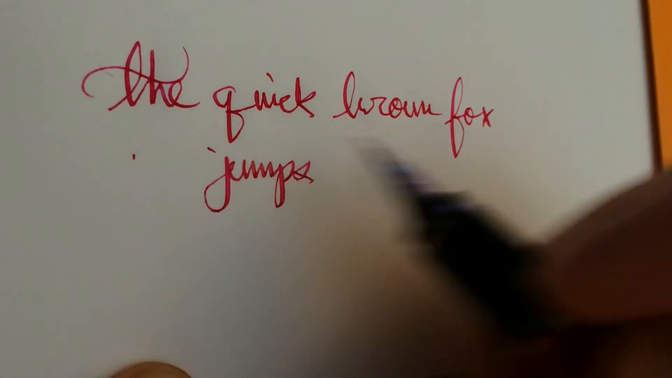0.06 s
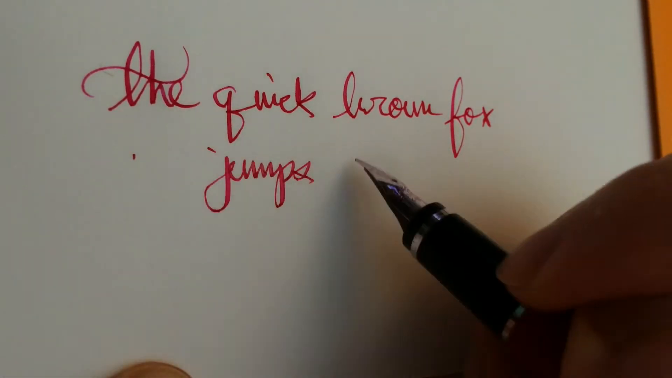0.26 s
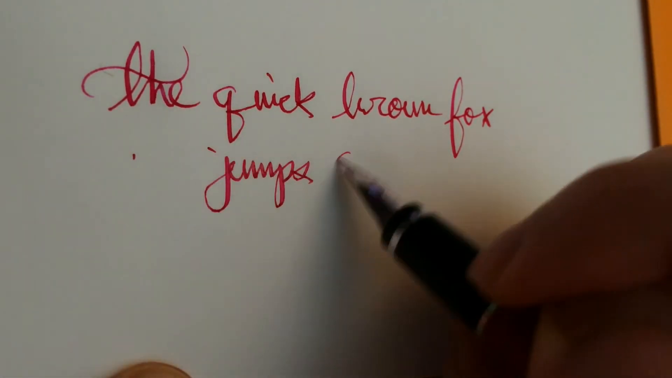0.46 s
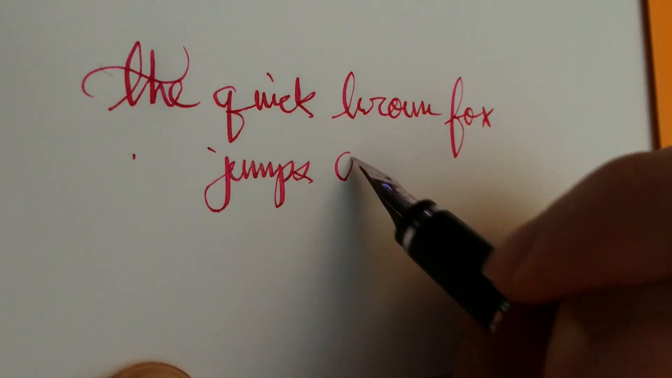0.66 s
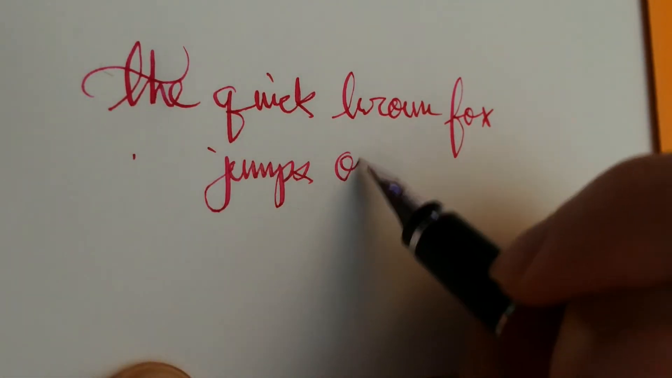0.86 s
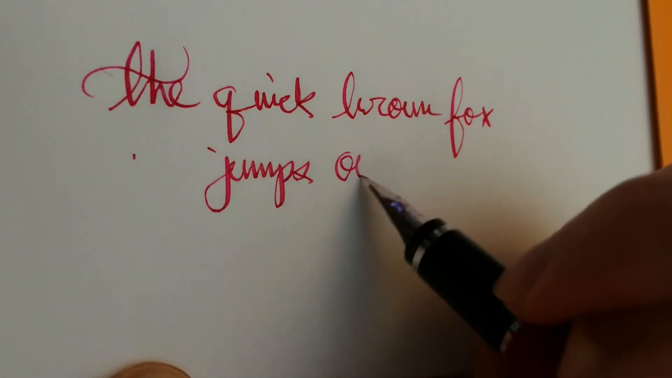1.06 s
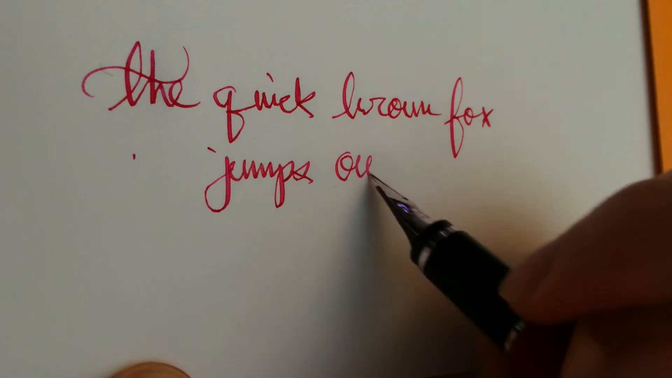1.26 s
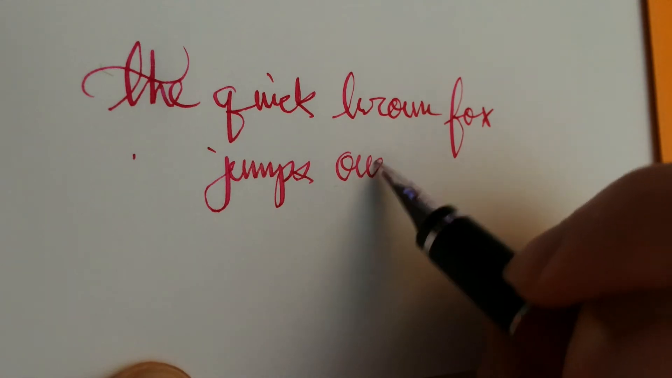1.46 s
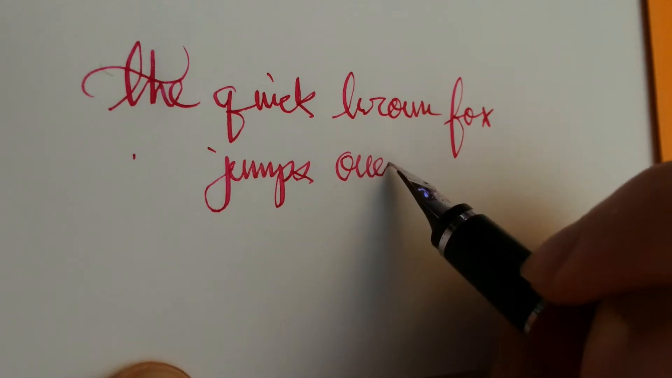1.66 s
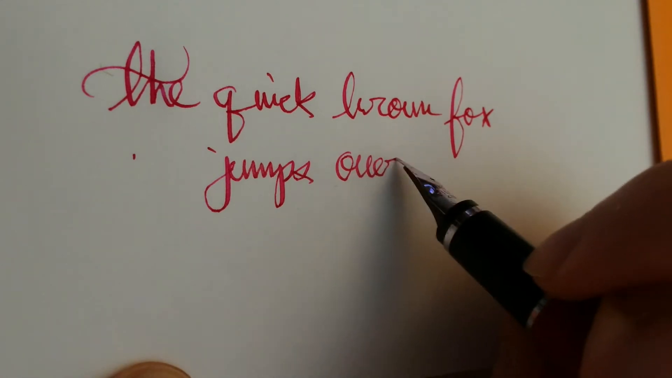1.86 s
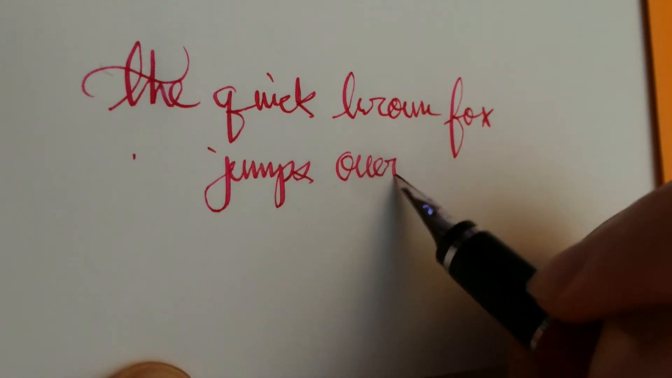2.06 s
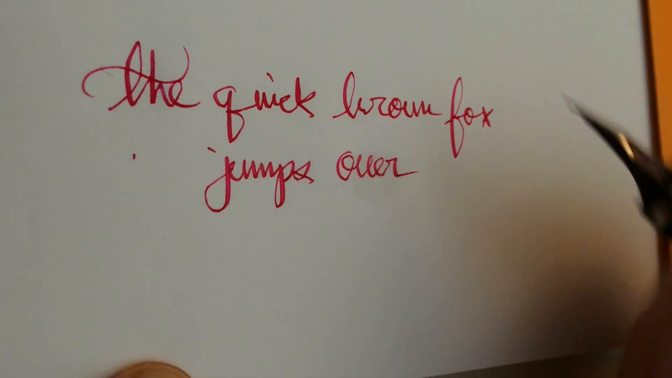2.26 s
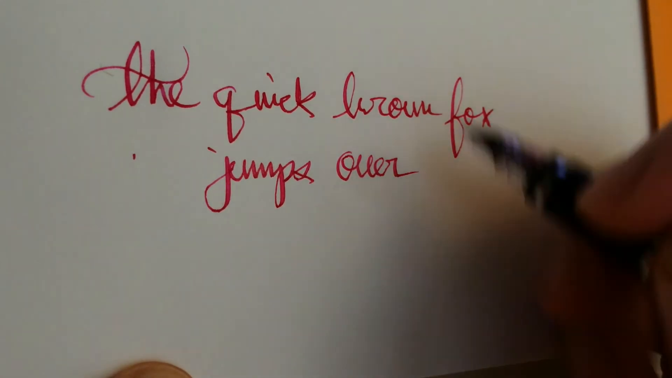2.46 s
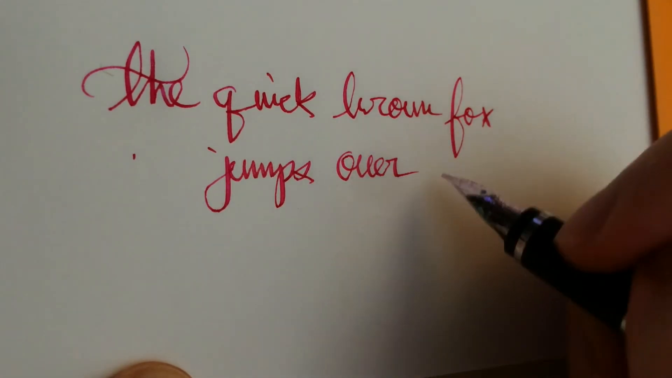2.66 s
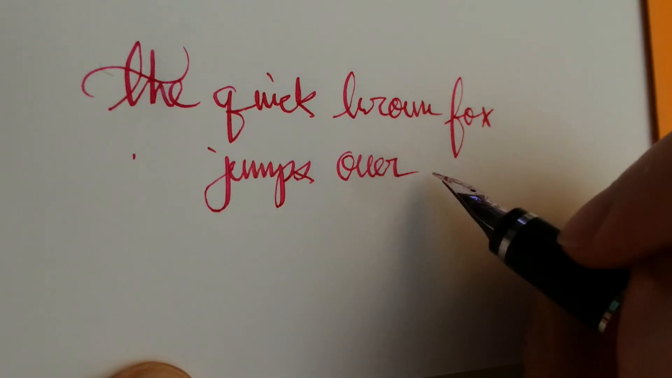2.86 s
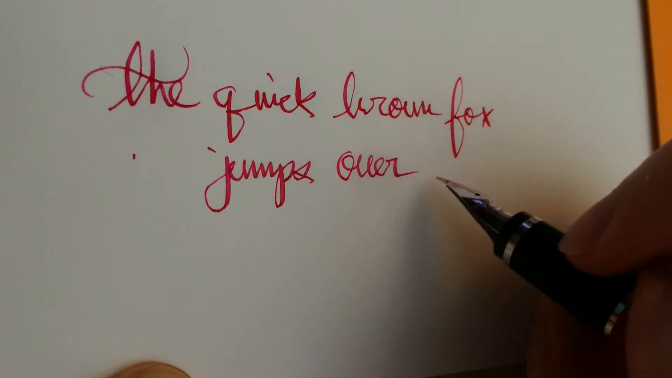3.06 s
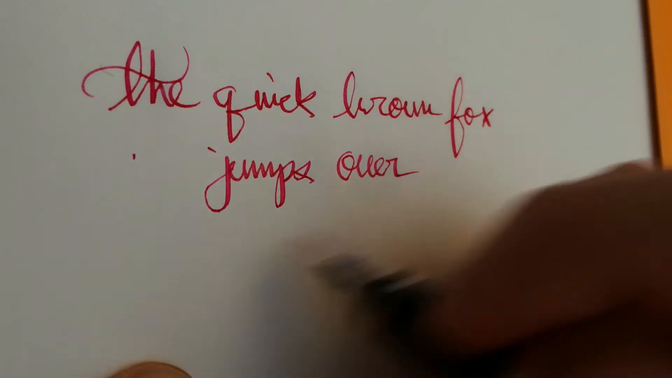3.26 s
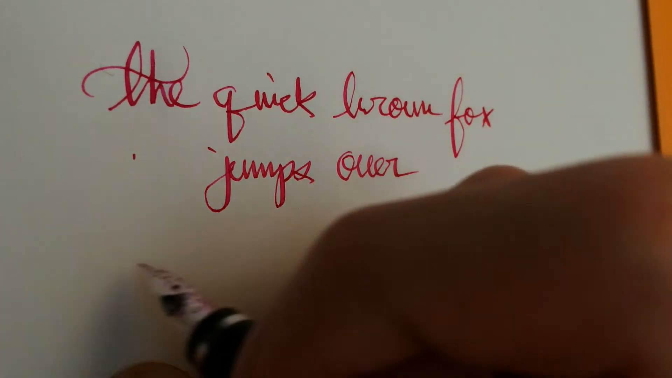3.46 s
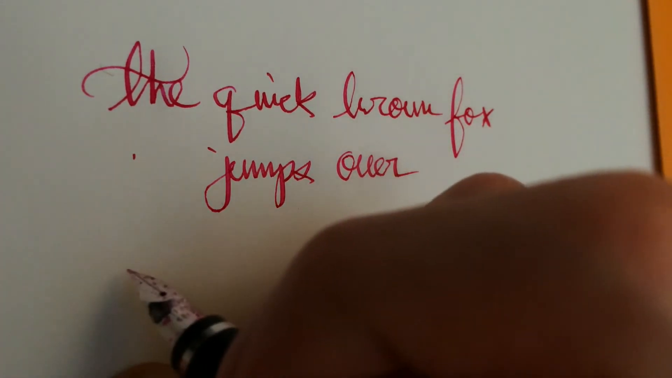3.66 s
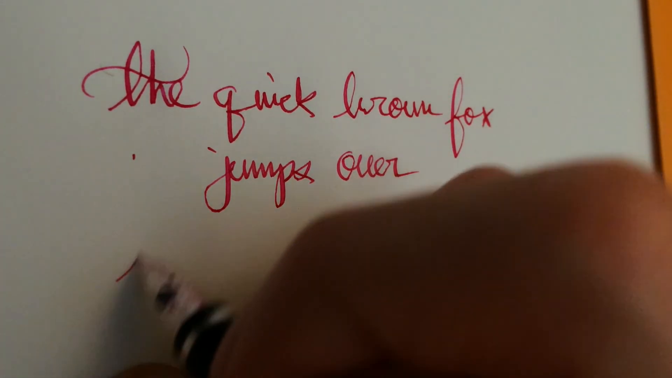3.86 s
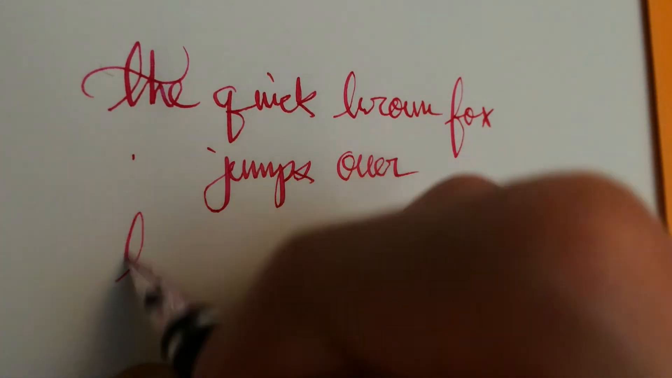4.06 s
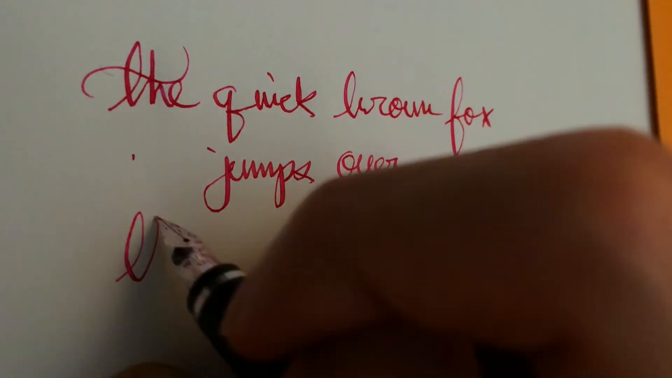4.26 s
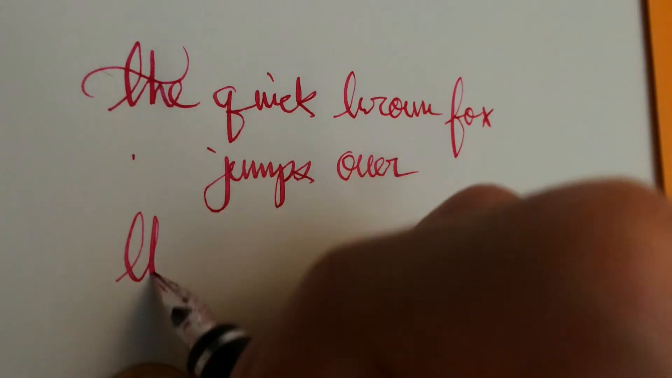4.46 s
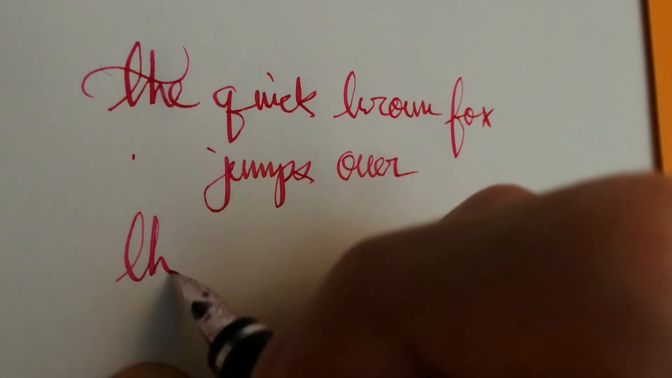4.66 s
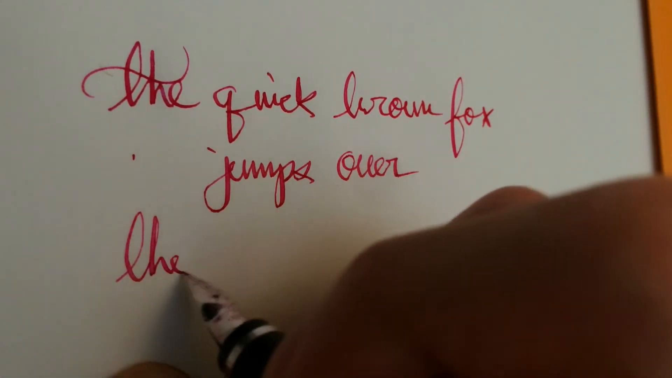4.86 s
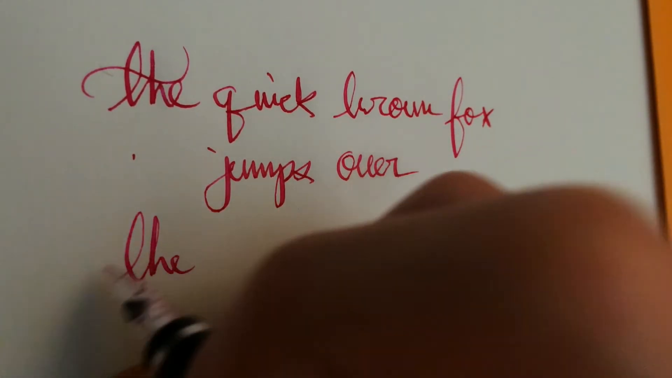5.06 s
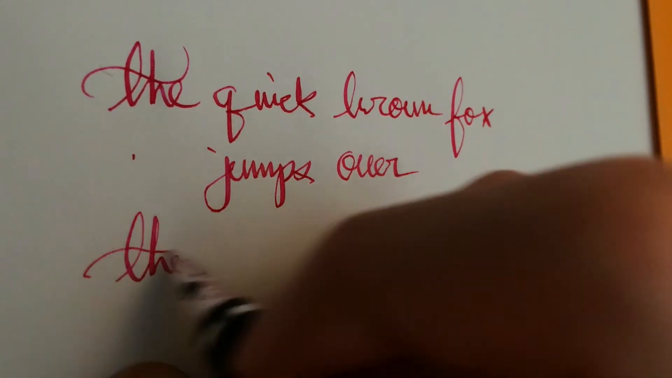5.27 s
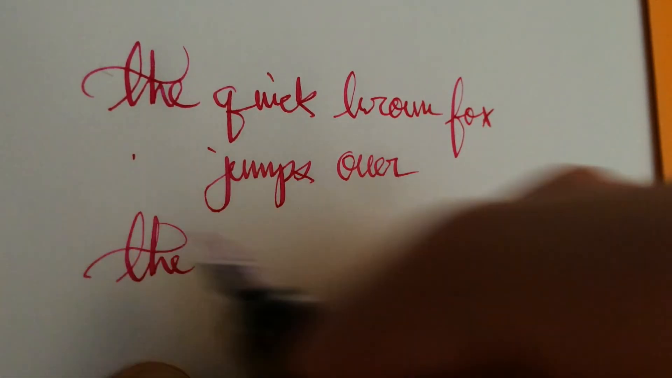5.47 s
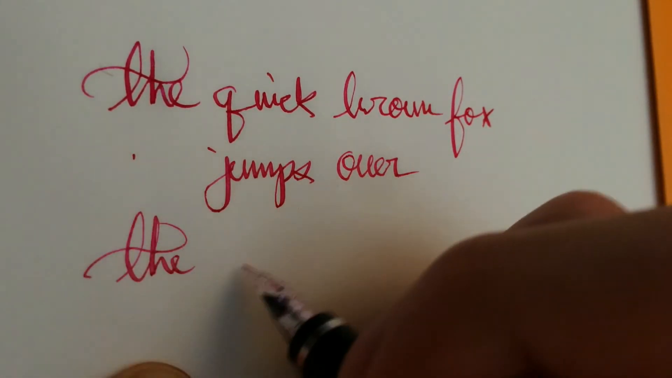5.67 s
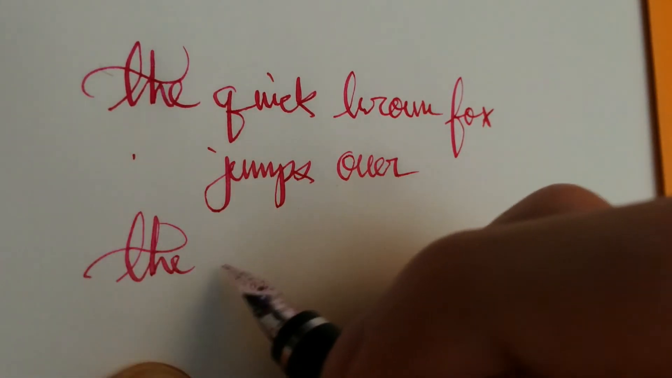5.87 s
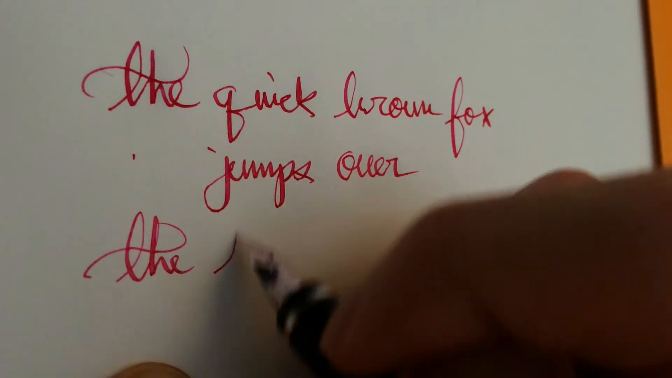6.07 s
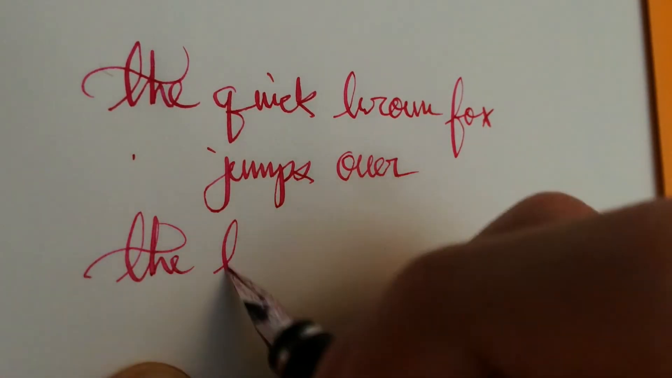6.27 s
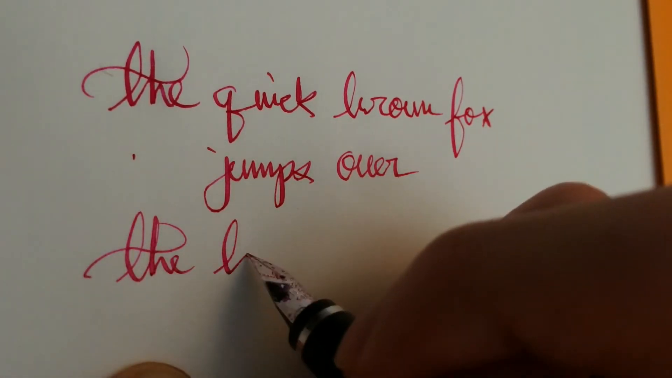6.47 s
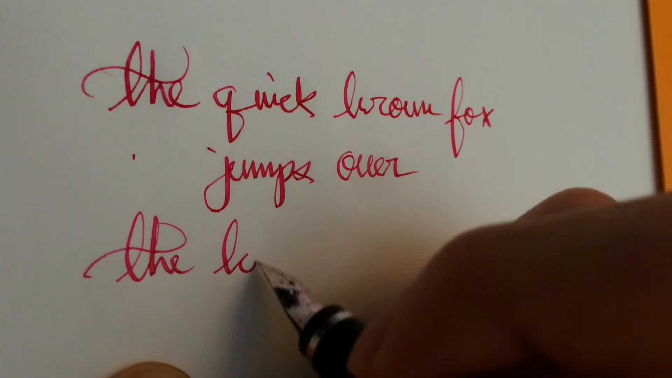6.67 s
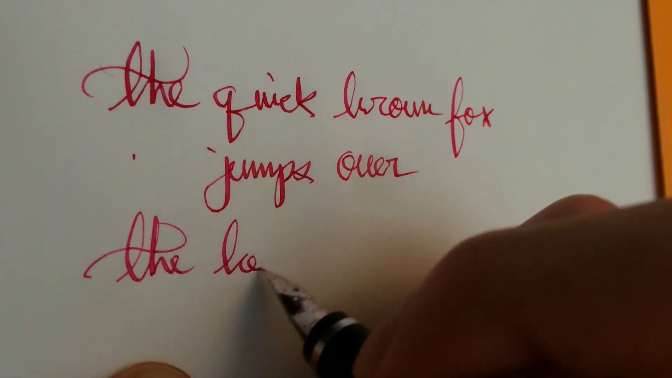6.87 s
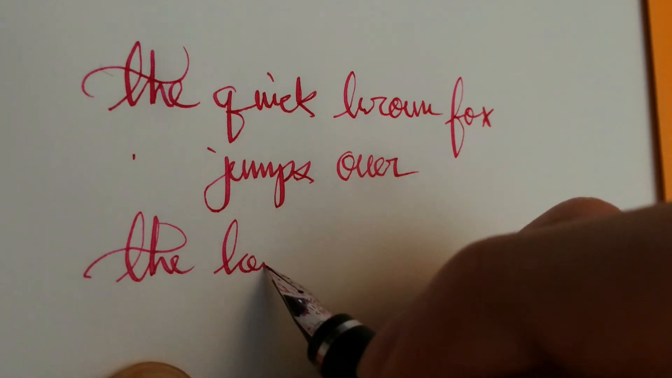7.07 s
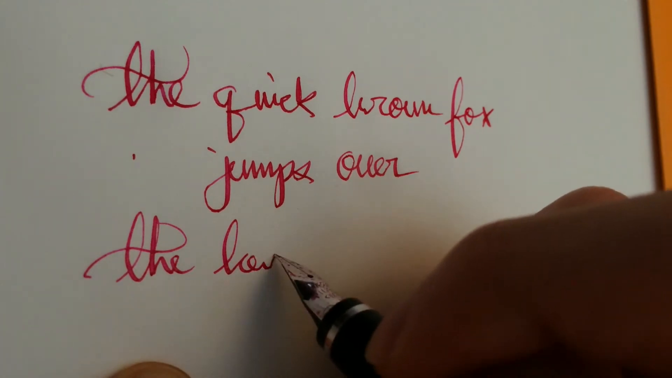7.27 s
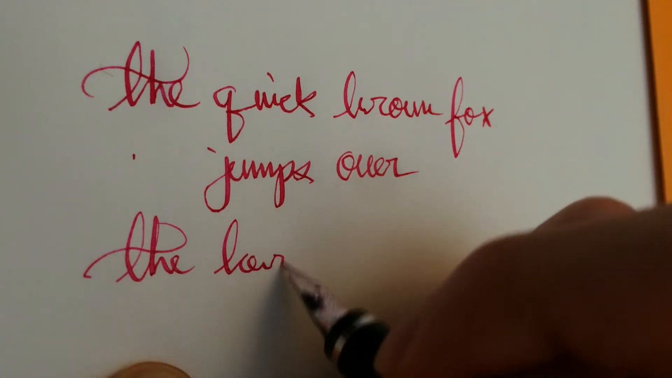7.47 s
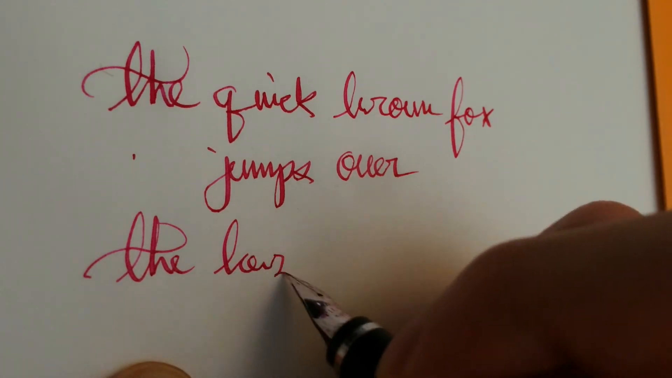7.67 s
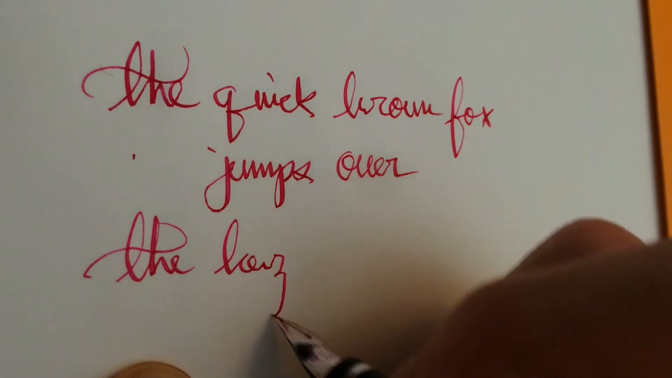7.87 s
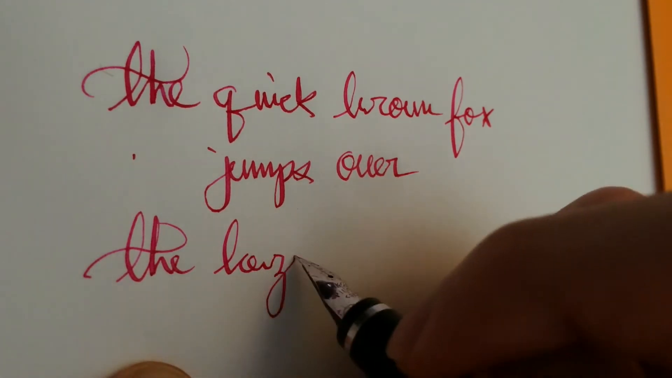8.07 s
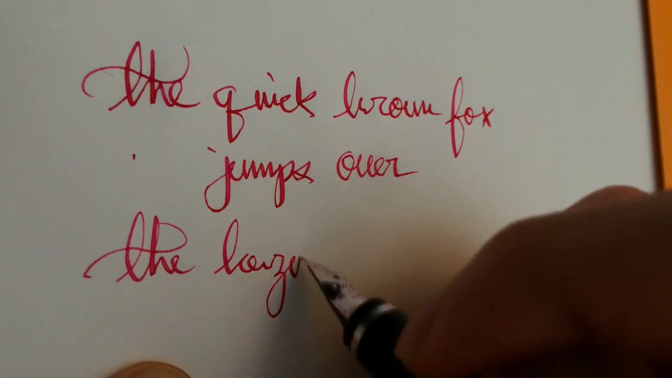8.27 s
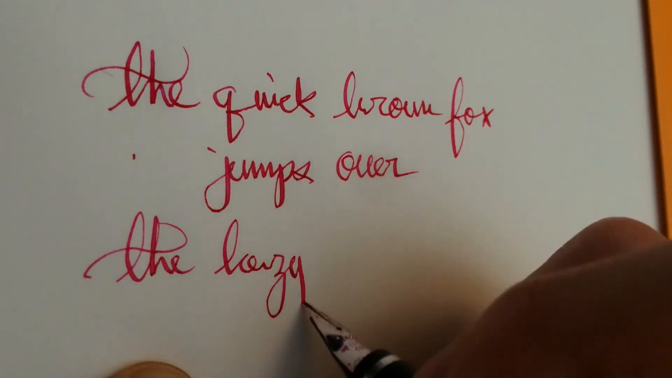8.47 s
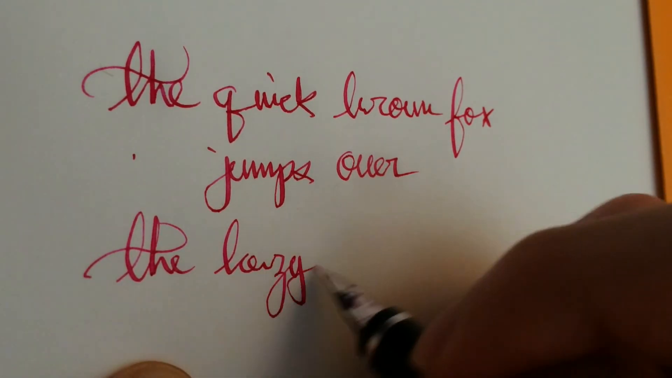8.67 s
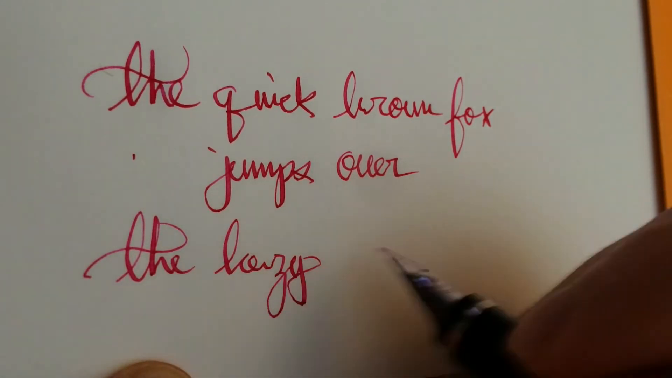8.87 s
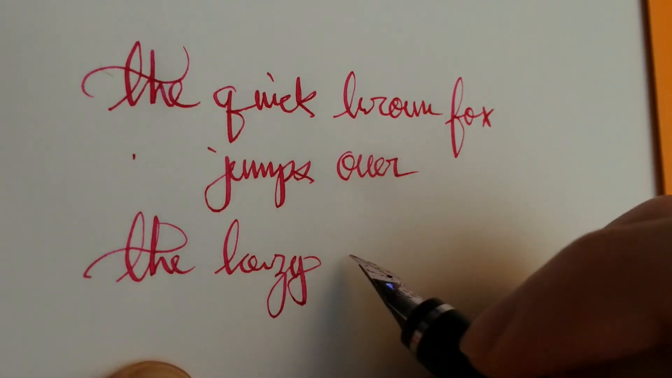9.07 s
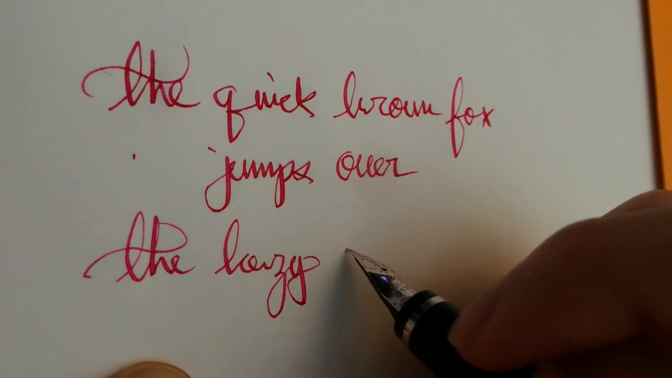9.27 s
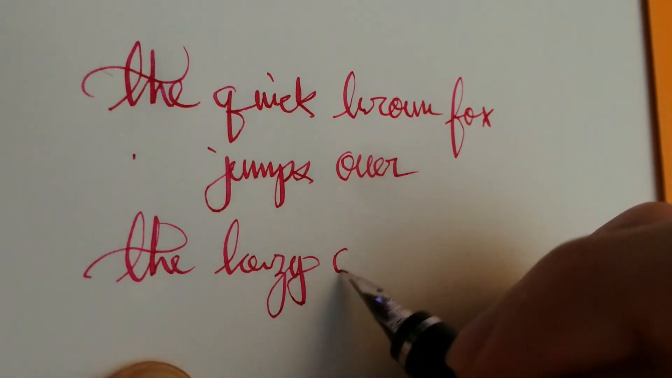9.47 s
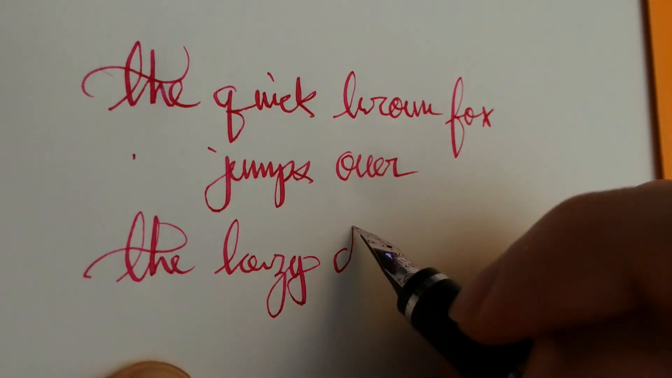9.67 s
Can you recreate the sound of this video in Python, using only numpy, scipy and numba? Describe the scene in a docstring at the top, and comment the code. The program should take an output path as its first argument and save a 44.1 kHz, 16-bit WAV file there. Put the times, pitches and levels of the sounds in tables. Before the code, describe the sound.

A fountain pen writes on a paper pad, close to the microphone in a quiet room. Short, dry scratching strokes come in uneven runs, dotted with sharp ticks as the nib catches and soft low bumps from the desk. After the first run comes a pause with faint rustles. The writing resumes more firmly, breaks briefly with a faint creak, then continues in a longer run over a low hum.

```python
"""Fountain pen on paper

A pen writes on a pad, close to a small microphone in a quiet room. Stick-slip friction between nib
and fibres excites the resonances of the pad and the steel tines; snags crack out singly. The hand
rumbles the desk, and between words faint creaks and rustles sound over the room's hum."""
import sys
import numpy as np
from scipy import signal
from scipy.fft import rfft, irfft
from scipy.io import wavfile
from scipy.ndimage import uniform_filter1d
from numba import njit

SR = 44100
rng = np.random.default_rng(int(sys.argv[2]) if len(sys.argv) > 2 else 0)


def master(y):
    """Save y as 16-bit WAV."""
    cut = np.clip(np.atleast_2d(y).T, -1, 1)
    pcm = np.round(cut * 32767)  # scale
    wavfile.write(sys.argv[1], SR, pcm.astype(np.int16))


N = 428211

# low and high modes of the steel tines: pitch_hz, width_hz, gain_db
TINE_LOW = [(1530, 730, 2.5), (2470, 393, 1.5), (3320, 540, -3), (4074, 270, -0.5), (4975, 1160, -4.5)]
TINE_HIGH = [(6570, 1240, 2), (7580, 1250, 5.5), (7940, 1110, 4.5), (11050, 1200, -1), (12230, 760, -4.5),
             (14500, 2000, -12)]


def strokes(speed, mean_speed, scratch_db, treble_db, pad_hz):
    """Stick-slip friction: coarse slips thump the pad, fine ones scratch, stray fibres crackle."""
    stutter = undb(0.92 * walk(60) + 2.0 * walk(200))
    coarse, fine = slips(500, 2.33), slips(12000, 2.0)
    ring = unit(pad(coarse + 0.67 * fine, np.clip(pad_hz, 300, 1500)))
    bursts = signal.lfilter([1], [1, -np.exp(-1 / (0.00047 * SR))], np.abs(slips(90, 1.75)))
    fibres = unit(bursts * rng.standard_normal(N))
    rub = fine + 0.16 * coarse + .5 * fibres
    scratch = undb(-treble_db / 2) * unit(body(rub, TINE_LOW, 3.3))
    scratch += undb(treble_db / 2) * unit(body(rub, TINE_HIGH, 1.55))
    # within a stroke the scratch swells less with speed than the thumping does
    swell = speed ** 1.332 * mean_speed ** 0.69
    # pressed hard, the spread tines add a rasp of their own
    rasp = undb(-4.5) * speed ** 2.69 * unit(steep_band(coarse + fine, 2400, 420))
    return stutter * (speed ** 2 * ring + undb(scratch_db) * swell * scratch / 2 + rasp)


def nib_motion():
    """Sliding speed drives friction: the pad's amplitude goes as its square. Also sets the timbre."""
    # pen strokes: start_s, rise_s, steady_s, fall_s, ring_db, relative_scratch_db
    gestures = [(0.034, 0.0035, 0.00032, 0.017, -38, -10.5), (.075, 0.039, 0.0035, 0.0032, -55.5, 11),
                (0.476, 0.074, 0.00065, 0.039, -38.5, -8.5), (.575, 0, 0.062, 0.053, -50.5, -4),
                (.677, 0, 0.026, 0.029, -39.5, -6.5), (0.725, 0.051, 0.003, 0, -41, -18),
                (0.797, 0.0013, 0.019, .02, -45, -4), (0.833, 0.039, 0.075, 0.029, -43.5, -9.5),
                (1.022, 0.015, 0, 0.093, -43, -8.5), (1.132, 0.05, 0.0071, 0.069, -44, -1),
                (1.274, 0, 0.0096, 0.15, -46, -6), (1.397, 0.028, 0.0039, 0.053, -41.5, -5),
                (1.503, 0, 0.17, 0.017, -53.5, -7), (1.66, 0.058, 0.021, 0.003, -47, -12),
                (1.81, 0.0037, 0.0033, 0.031, -47, -7.5), (1.867, .069, 0.00032, 0.001, -46.5, -3),
                (2.046, 0, 0.012, 0.13, -52, -0.5), (2.167, 0.0028, 0.034, 0, -34.5, -11.5),
                (2.207, 0.007, 0.054, 0, -67, 6), (3.886, 0.076, 0.014, 0, -35, -4.5),
                (3.938, 0.066, 0.0052, 0.021, -24, -10.5), (4.069, 0.044, 0.0074, 0.059, -28, -11),
                (4.165, 0, .098, 0, -50, -3.5), (4.258, 0.051, 0.0051, 0.039, -30.5, -1.5),
                (4.397, 0.05, 0.0005, 0.054, -30, -10), (4.556, 0, 0.024, .02, -49.5, -12),
                (4.588, 0.00049, 0.00057, 0.035, -35.5, -9), (4.635, 0.033, 0, 0.062, -49, 0),
                (4.738, 0.04, 0.0036, 0.019, -40.5, -6), (4.813, 0.0044, .109, 0.0017, -52, -7.5),
                (4.926, 0.049, 0, 0.017, -47.5, -0.5), (5.18, 0.0091, 0, 0.031, -43.5, -4.5),
                (5.23, 0.029, 0.089, 0.008, -35, -5), (5.343, 0, 0.0011, 0.048, -28.5, -11.5),
                (5.379, 0.048, 0.0088, 0.026, -35, -5), (6.05, 0.032, 0.081, .04, -39, -8),
                (6.246, 0.023, 0.0084, .09, -30.5, -15), (6.431, 0.034, 0.004, 0.034, -35.5, -11),
                (6.582, 0.0052, 0, 0.035, -38, -19), (6.62, 0.025, 0.13, 0.024, -55, -5),
                (6.822, 0, .165, 0, -52.5, -8), (7.105, 0, .057, 0.0058, -65.5, -9),
                (7.194, 0, 0.03, 0.036, -57, -11), (7.277, 0.003, 0, 0.059, -50, -1.5),
                (7.465, 0.0053, 0.013, 0.066, -52.5, -6), (7.526, 0.034, 0.001, 0.032, -36.5, -14.5),
                (7.595, 0.0011, 0.0014, 0.041, -46.5, -5), (7.716, 0.0046, 0.0018, 0.058, -48.5, -13.5),
                (7.781, 0.079, 0.0023, 0.072, -37.5, -10), (7.912, 0, 0.048, 0.0087, -45.5, -5),
                (7.972, 0, 0.079, 0.11, -41.5, -8), (8.196, 0.0037, 0.019, 0.088, -44, -8),
                (8.31, 0.016, 0.0016, 0.032, -32.5, -14.5), (8.421, 0.04, 0.0048, 0.02, -38.5, -9.5),
                (8.456, 0, 0.087, 0.018, -48, -3.5), (8.608, 0.00055, 0.0073, 0.033, -28.5, -19),
                (8.639, 0.0028, 0, 0.029, -29.5, -21), (8.672, 0.0028, 0.064, 0, -52, -6.5),
                (8.706, 0.0011, 0, 0.076, -32.5, -13), (8.788, 0.051, 0, 0.022, -33.5, -9),
                (8.885, .015, 0.012, .02, -56.5, 2), (9.389, 0.013, .026, 0.0037, -38.5, -5),
                (9.444, 0.0037, 0.024, 0.13, -48, -4.5), (9.56, .03, .05, 0.021, -44, -9),
                (9.645, .008, .006, 0, -36, -14), (9.672, 0, .01, .04, -36, -10)]
    # the pad's resonance shifts as the nib crosses the page: time_s, pitch_hz
    pad_tuning = [(.1, 786), (.5, 607), (1.1, 650), (2.2, 707), (3.95, 660), (4.6, 770), (5.3, 762),
                  (6.2, 730), (6.8, 764), (7.55, 720), (7.95, 810), (8.3, 690), (8.7, 777), (9.4, 620),
                  (9.7, 655)]
    t = np.arange(N) / SR
    speed, held = np.zeros(N), np.ones((3, N))
    for start, rise, steady, fall, db, scratch_db in gestures:
        corners = start + np.cumsum([0, rise, steady, fall])
        i, j = int(start * SR), min(int(corners[3] * SR), N)
        stroke = undb(db / 2) * np.interp(t[i:j], corners, [0.23, 1, 1, 0.19])
        takeover = i + np.argmax(stroke > speed[i:j])
        speed[i:j] = np.maximum(speed[i:j], stroke)
        treble_db = -5 - 0.18 * (db + 48.5)  # harder strokes are duller
        held[:, takeover:] = [[stroke.mean()], [scratch_db], [treble_db]]
    smooth = int(0.0029 * SR)
    speed = np.abs(uniform_filter1d(speed, smooth))
    pad_hz = np.interp(t, *np.transpose(pad_tuning)) * (1 + 0.069 * walk(20))
    return speed, *uniform_filter1d(held, 2 * smooth), pad_hz


def snags(speed):
    """Impulse excitation: the nib snaps free of a fibre, cracking the tines and knocking the pad."""
    # catches on fibres: time_s, crack_drive_db, knock_drive_db
    catches = [(.0383, -38, -34), (0.5248, -33.5, -43), (0.6866, -34.5, -42), (0.7388, -49, -28),
               (0.7697, -42, -40), (0.7926, -38, -59), (0.892, -28.5, -26), (1.2767, -47, -31),
               (1.371, -43, -58), (1.3927, -33.5, -36), (1.5253, -40, -48), (1.6671, -37.5, -44),
               (1.679, -39, -46), (1.691, -51, -42), (1.7186, -40.5, -48), (2.1655, -18.5, -25),
               (2.2694, -46.5, -45), (3.266, -45, -41), (3.8387, -48, -47.5), (3.9557, -26, -36),
               (3.9883, -34, -25), (4.0153, -40, -16), (4.073, -44, -52), (4.2671, -29, -24),
               (4.456, -43, -22), (4.5583, -36.5, -26), (4.567, -48, -26), (4.591, -39, -27),
               (4.7414, -32.5, -28), (4.7661, -39, -29.5), (5.2385, -33, -20.5), (5.3291, -32, -18),
               (5.3972, -35, -20.5), (5.5448, -44.5, -46), (5.9902, -50.5, -70), (6.0822, -37.5, -18.5),
               (6.2588, -44, -30), (6.4316, -32, -30), (6.4562, -30, -19.5), (6.4698, -40, -16),
               (6.575, -41, -27), (6.8234, -49, -36), (7.2035, -43, -57), (7.2432, -40, -38),
               (7.5662, -49, -25.5), (7.6022, -30.5, -44), (7.8381, -37.5, -31), (7.847, -42, -26),
               (7.866, -44, -24), (7.9165, -24.5, -26), (7.9305, -26, -31), (7.9479, -34.5, -19),
               (7.9786, -33, -21.5), (8.0596, -24.5, -21), (8.1937, -41, -41), (8.3192, -38, -33),
               (8.5963, -27, -29), (8.6098, -21.5, -19.5), (8.6423, -17, -13), (8.7107, -19.5, -16.5),
               (8.8285, -37, -45), (8.8973, -40, -51), (9.3913, -43, -32.5), (9.406, -29, -49),
               (9.654, -56, -33), (9.6731, -36, -23.5)]
    times, crack_db, knock_db = np.transpose(catches)
    high_db = -45 + 0.33 * (crack_db + 33)
    ticks = rng.random(N) < 70 / SR  # small catches all along the strokes
    ticks = ticks * undb(-50.5 + 2.82 * rng.exponential(size=N)) * (speed / 0.13) ** 1.14
    t = np.arange(int(.04 * SR)) / SR
    tail = np.exp(-t / 0.00066) + 0.27 * np.exp(-t / 0.0053)
    drives = impulses(times, crack_db) + ticks, impulses(times, high_db) + undb(-2.5) * ticks
    low, high = (signal.fftconvolve(x, tail)[:N] * rng.standard_normal(N) for x in drives)
    low -= 0.46 * band(low, 1470, 1100)  # a crack is thin: it stirs the lowest mode least
    crack = body(low, TINE_LOW, 0.44) + body(high, TINE_HIGH, 1.3)
    blows = impulses(times, knock_db)
    knock = pad(blows, np.full(N, 760.)) - undb(-11) * steep_band(blows, 1210, 670)
    return undb(7) * crack + undb(29) * knock


def pad(x, hz):
    """Damped resonance: the paper rings in one broad band, with a shoulder above and the wood below."""
    main = moving_band(moving_band(x, hz, 436.0), hz, 590.0)
    shoulder = moving_band(moving_band(x, 1.43 * hz, 600.0), 1.193 * hz, 735.0)
    return main - undb(-11.5) * shoulder - undb(-16.5) * steep_band(x, 359, 114)


def desk(speed):
    """Forced vibration: the desk top rumbles under the writing hand and booms at each bump."""
    # bumps of pen or hand: time_s, drive_db
    knocks = [(0.092, -45), (.697, -40), (1.422, -42), (1.715, -46), (2.092, -44), (3.254, -44.5),
              (4.172, -38), (4.451, -48), (4.559, -33.5), (4.671, -41), (5.65, -45.5), (6.09, -40),
              (6.33, -40), (6.459, -40), (8.219, -39.5), (8.454, -39), (8.605, -39.5), (8.9, -46)]
    # modes of the desk top: pitch_hz, width_hz, gain_db
    modes = [(55, 18, -6.5), (111, 49, -4), (161.7, 18, 4.5), (281, 49.5, -2), (346, 110, -5.5)]
    effort = np.abs(uniform_filter1d(speed, int(.06 * SR))) ** 0.92
    drag = effort * slips(3000, 1.6) * undb(-9.5 + 2.68 * walk(15))
    push = np.hanning(int(0.0041 * SR))
    bumps = np.convolve(impulses(*np.transpose(knocks)), push)[:N] * undb(8.5)
    return body(drag + bumps, modes, 1.3)


def creak():
    """A train of damped oscillations: slow, uneven pulses each ring briefly at their own pitch."""
    # course of the creak: time_s, pulses_per_s, level_db, pitch_hz
    course = [(5.588, 83, -47, 770), (5.604, 82, -44, 1090), (5.644, 61, -43.5, 720),
              (5.725, 75, -42.5, 1060), (5.76, 34, -61, 1180), (5.81, 69, -48, 1744)]
    times, per_s, db, hz = np.transpose(course)
    span = np.arange(times[0], times[-1], 1 / SR)
    cycles = np.cumsum(np.interp(span, times, per_s)) / SR
    onsets = np.interp(np.arange(cycles[-1]), cycles, span)
    out, t = np.zeros(N), np.arange(int(.04 * SR)) / SR
    grit = 1 + 0.65 * walk(830)
    for at, (size, detune) in zip(onsets, rng.standard_normal((40, 2))):
        pitch_hz = np.interp(at, times, hz) * (1 + 0.049 * detune)
        ring = np.exp(-t / 0.0055) * np.sin(2 * np.pi * pitch_hz * t)
        out[int(at * SR):][:len(t)] += undb(np.interp(at, times, db) + 1.5 * size) * ring
    return out * grit


def rustles():
    """Band-limited shot noise: short, grainy swells while the pen is lifted."""
    # faint rustles: start_s, length_s, level_db, centre_hz, width_hz
    swells = [(2.501, 0.065, -59.5, 3500, 1500), (2.506, 0.068, -61, 1350, 400),
              (2.564, 0.022, -58, 3700, 2500), (2.681, 0.069, -62, 3650, 3000),
              (2.798, 0.022, -64, 3500, 3000), (3.174, 0.32, -63.5, 5600, 10000),
              (3.246, 0.058, -58.5, 895, 1500)]
    t, out = np.arange(N) / SR, 0
    for start, length, db, hz, width in swells:
        swell = np.sin(np.pi * np.clip((t - start) / length, 0, 1))
        out += undb(db) * swell * unit(steep_band(slips(2000, 1.3), hz, width))
    return out


def walls(x):
    """Reverberation: the near walls return a short, exponentially decaying tail."""
    t = np.arange(int(.15 * SR)) / SR
    response = rng.standard_normal(len(t)) * np.exp(-t / 0.0099) * (t > .003)
    return undb(-35) * signal.fftconvolve(x, response)[:N]


def room():
    """The noise floor: hum of the room and hiss of the microphone, wavering a little."""
    # noise spectrum: frequency_hz, relative_density_db
    spectrum = [(12, -23), (20, -13.5), (53, -5), (98, -4.5), (158, -12), (198, -2.5), (262, -13.5),
                (485, -17), (780, -21.5), (1150, -25.5), (6910, -32.5), (13200, -32.5), (16000, -42.5)]
    hz, db = np.transpose(spectrum)
    bin_hz = np.maximum(np.arange(N // 2 + 1) * SR / N, 1)
    gain = undb(np.interp(np.log(bin_hz), np.log(hz), db))
    noise = irfft(rfft(rng.standard_normal(N)) * gain, N)
    return undb(-59.5 + 0.71 * walk(3.4)) * unit(noise)


def undb(db):
    """Decibels to amplitude ratio."""
    return 10 ** (np.asarray(db) / 20)


def unit(x):
    """Normalisation to an RMS of 1."""
    return x / np.sqrt(np.mean(x ** 2))


@njit
def moving_band(x, hz, width):
    """Tunable resonance: a state-variable band-pass, gain 1 at the centre."""
    y, mid, low = np.empty(len(x)), 0., 0.
    for i in range(len(x)):
        g, damping = np.tan(np.pi * hz[i] / SR), width / hz[i]
        v = (mid + g * (x[i] + 1e-18 - low)) / (1 + g * (g + damping))
        mid, low, y[i] = 2 * v - mid, low + 2 * g * v, damping * v
    return y


def band(x, hz, width):
    """Second-order resonance, gain 1 at the centre."""
    return signal.lfilter(*signal.iirpeak(hz, hz / width, SR), x)


def steep_band(x, hz, width):
    """Two equal resonances in cascade."""
    return band(band(x, hz, width), hz, width)


def body(x, modes, flicker_db):
    """Modal superposition in alternating sign; each level wanders as the contact point moves."""
    return sum((-1) ** k * undb(db + flicker_db * walk(25)) * band(x, hz, width)
               for k, (hz, width, db) in enumerate(modes))


def walk(per_s):
    """Slow random modulation: random steps smoothed twice, RMS 1."""
    hold = int(SR / per_s)
    steps = np.repeat(rng.standard_normal(N // hold + 1), hold)
    return unit(uniform_filter1d(uniform_filter1d(steps, hold), hold)[:N])


def slips(per_s, spread_db):
    """Shot noise: random impulses, a few much larger than the rest."""
    hit = rng.random(N) < per_s / SR
    return unit(hit * rng.choice([-1, 1], N) * undb(spread_db * rng.exponential(size=N)))


def impulses(times, db):
    """Ideal impacts, one sample each."""
    x = np.zeros(N)
    np.add.at(x, (np.asarray(times) * SR).astype(int), undb(db))
    return x


def scene():
    """Superposition of the pen, its reflections and the background in one channel."""
    speed, *timbre = nib_motion()
    pen = strokes(speed, *timbre) + snags(speed)
    return (pen + walls(pen) + desk(speed) + creak() + rustles() + room())[None]


def record(dry):
    """Band limiting: the recorder's steep low-pass cuts the top."""
    cutoff_hz = 15850
    return signal.sosfilt(signal.ellip(8, .2, 70, cutoff_hz, fs=SR, output="sos"), dry)


dry = scene()
out = record(dry)
master(out)
```